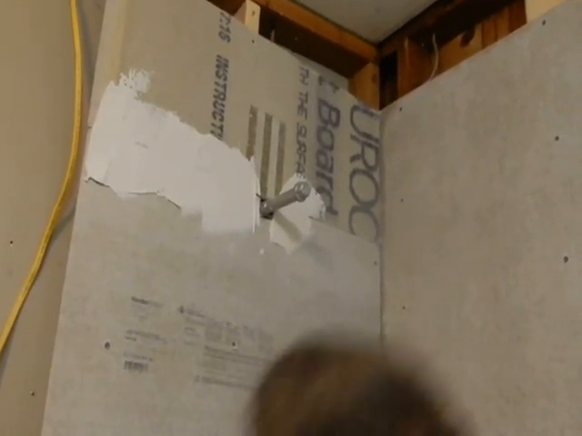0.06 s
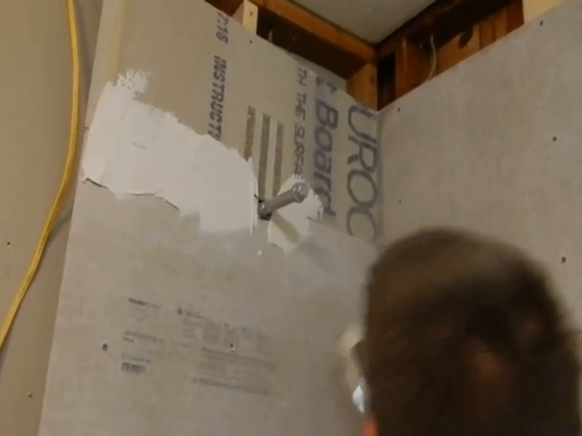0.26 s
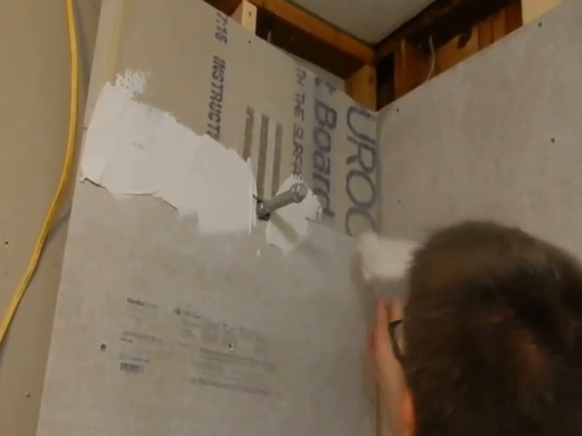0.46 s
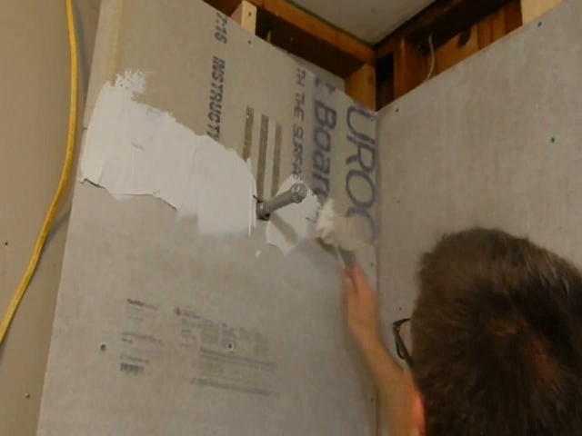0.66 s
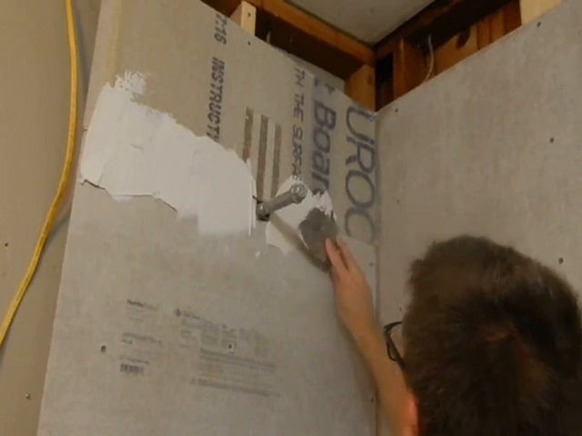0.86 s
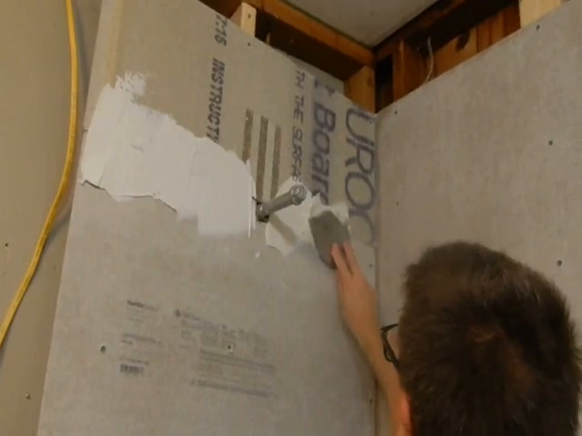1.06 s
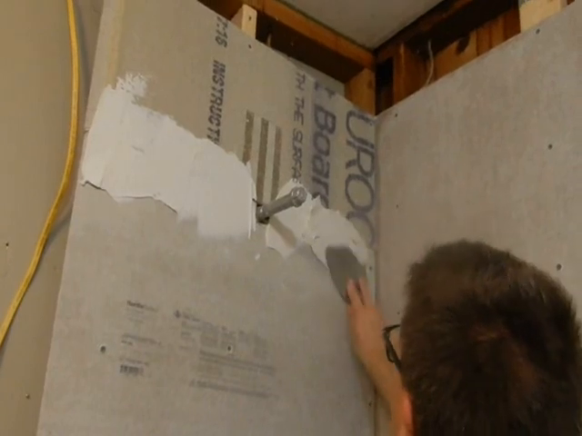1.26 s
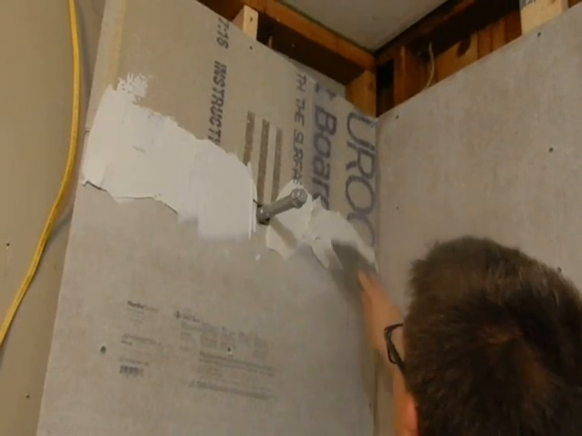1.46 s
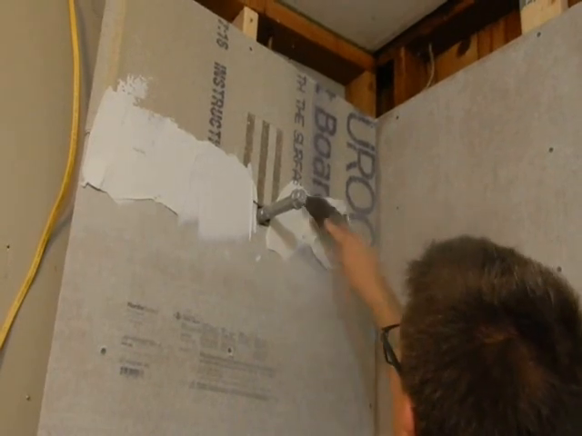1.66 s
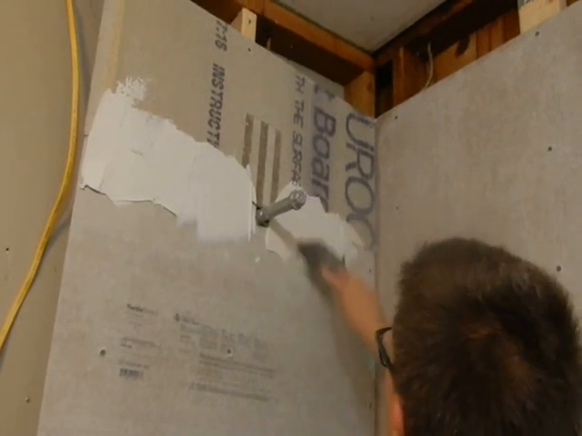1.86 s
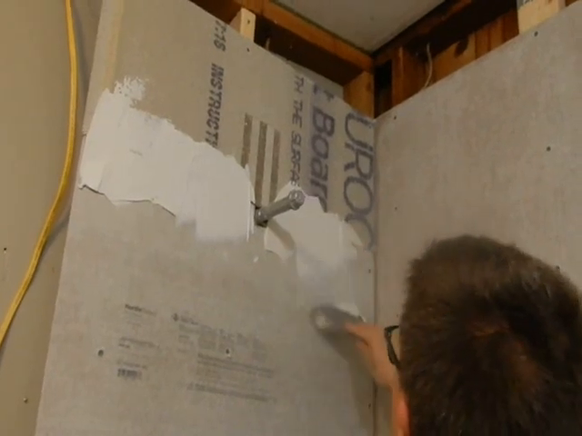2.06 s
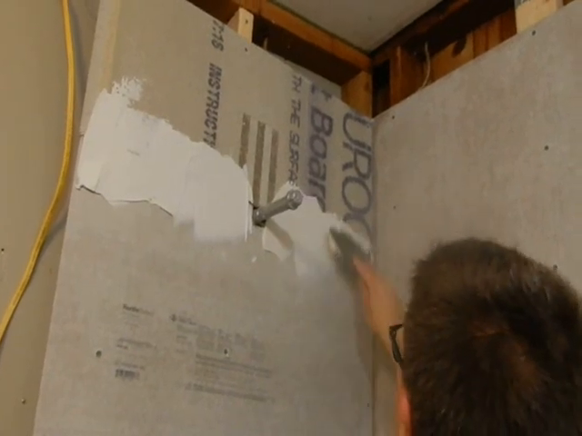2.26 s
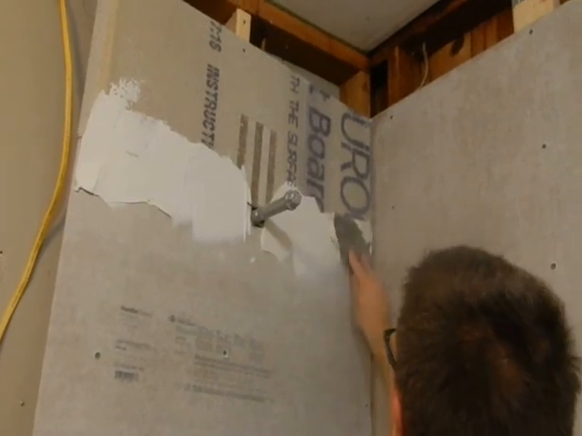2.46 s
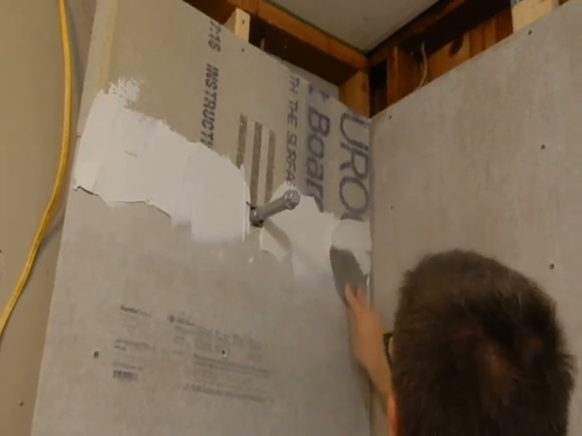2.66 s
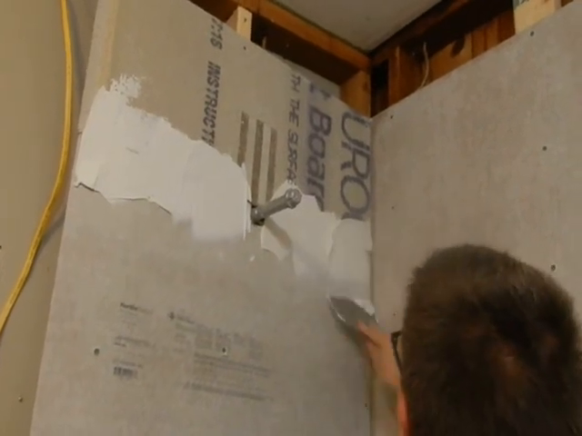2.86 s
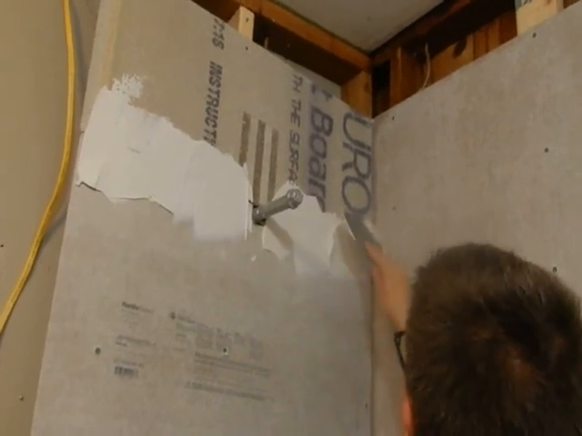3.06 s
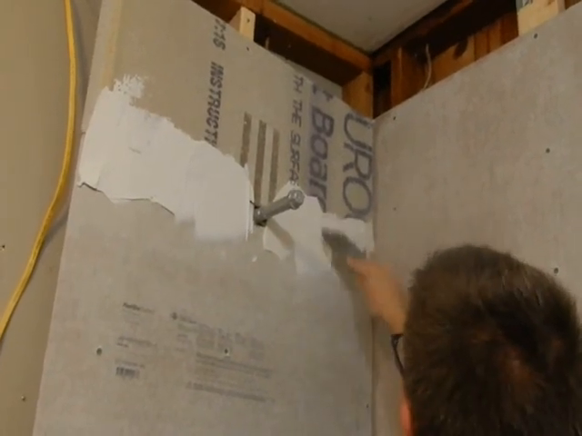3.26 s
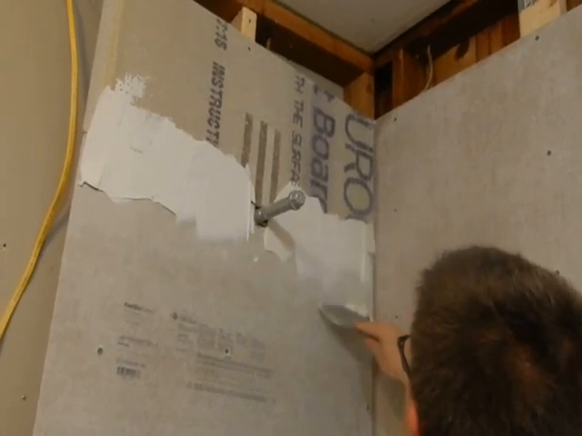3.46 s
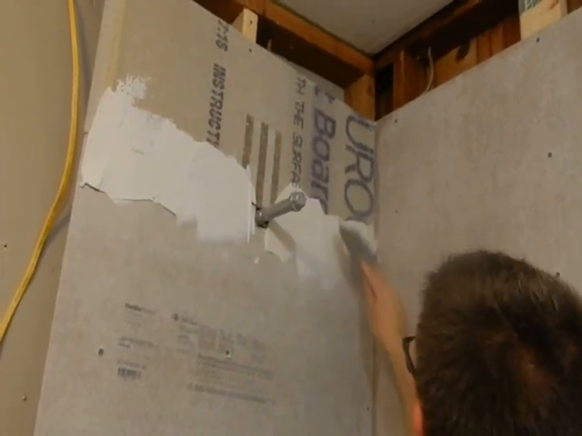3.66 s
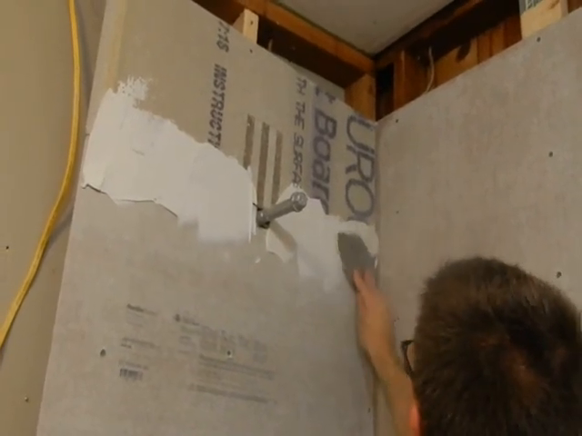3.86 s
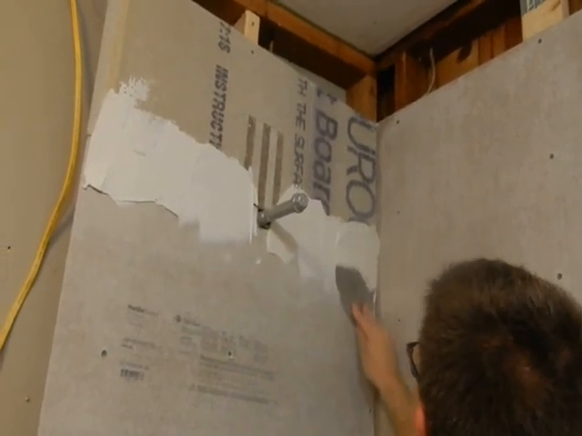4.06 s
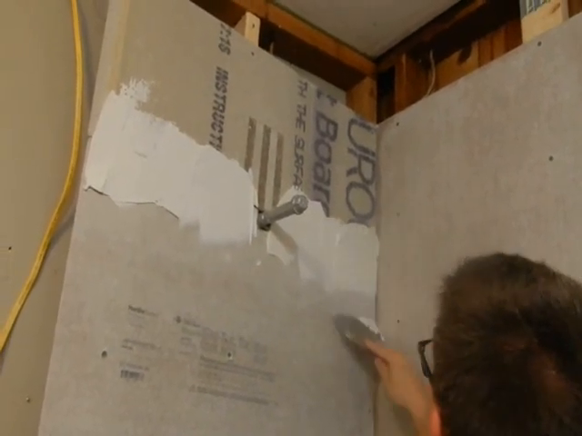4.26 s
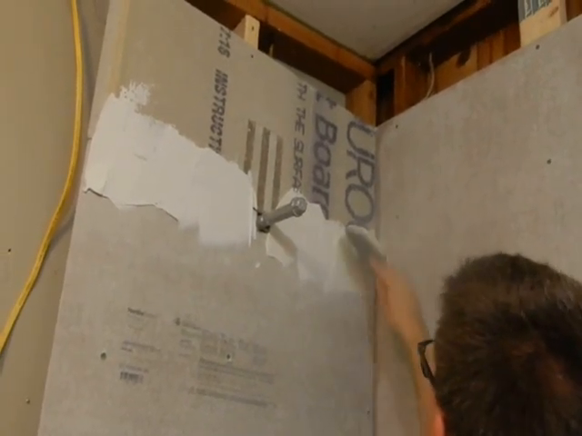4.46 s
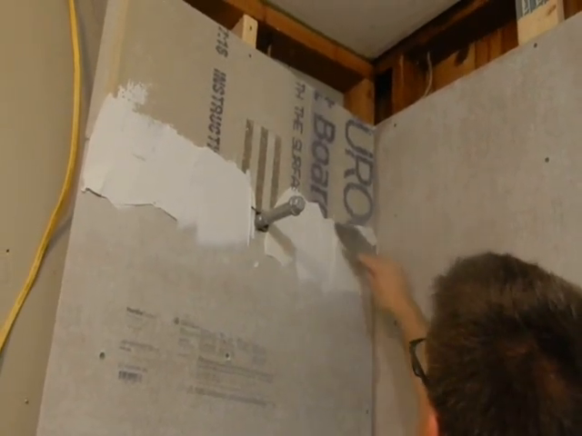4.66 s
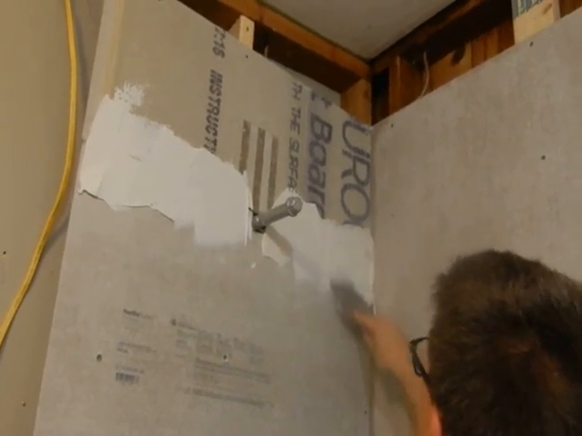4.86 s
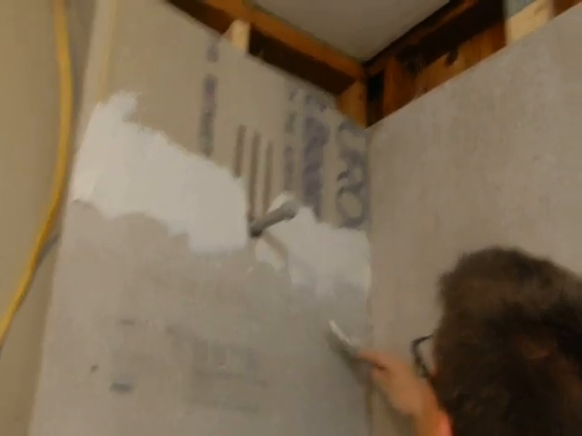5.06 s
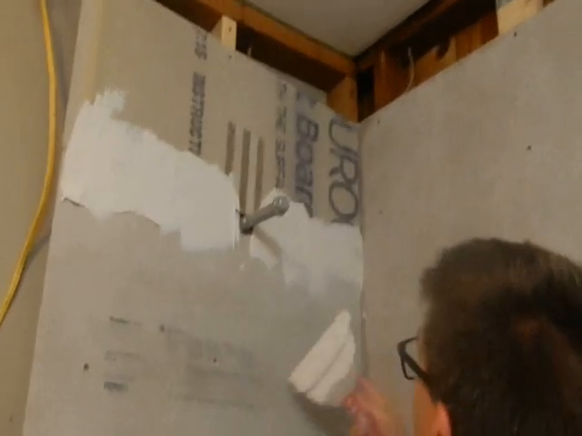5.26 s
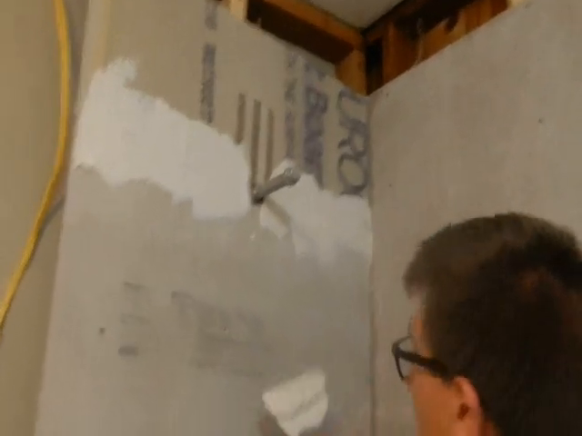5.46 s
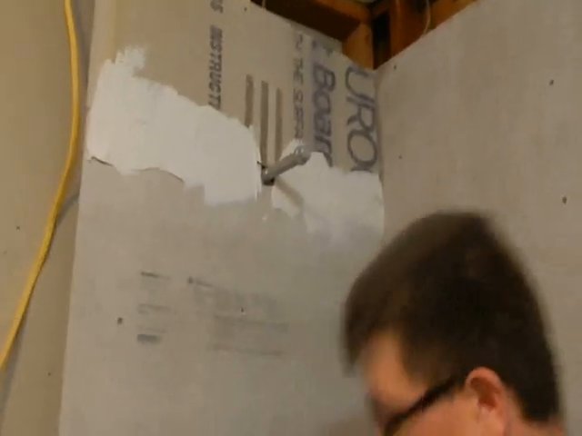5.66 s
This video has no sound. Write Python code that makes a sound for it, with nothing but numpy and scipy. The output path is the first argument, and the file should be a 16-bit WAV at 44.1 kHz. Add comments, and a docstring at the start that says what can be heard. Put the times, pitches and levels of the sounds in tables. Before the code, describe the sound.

Close stereo sound of a steel trowel working gritty mortar on hollow cement board in a small bare room, over faint, low, slightly wavering house air. It opens with a barely audible wet drag dying away, one tiny tick near 0.6 s, a dull touch at 0.9 and faint scrapes. At 1.5 s the blade bites: a sudden bright, ringing, chattering rasp with soft thuds. A light click-knock at 1.95 leads to a strong sandy swipe around 2.2. After a lull, a hard hollow knock with steel clack lands at 2.7, followed by shorter rasps until 3.1. A muffled thump at 3.4 precedes a clear scrape at 3.65. Another strong, slightly duller knock at 4.05 leads into wet, board-shaking scrapes to 4.5. The last bright, weighty knock comes at 4.8, then hissing strokes at 5.0, 5.2 and 5.4, with grain ticks, fading out by about 5.8. Echoes are brief and dense.

```python
"""A faint wet drag over quiet house air, then a steel trowel knocking and rasping in a small, bare bathroom.
The loaded blade spreads mortar on cement board: random grain clicks, coloured by spectra, hiss in its strokes.
Blows on the hollow wall ring sine modes of wall and blade and a dense clack; snapping grains are noise bursts.
Hard walls add a brief echo, and two close microphones behind the worker hear it all."""
import sys
import numpy as np
from scipy import signal
from scipy.io import wavfile

SR = 44100
rng = np.random.default_rng(int(sys.argv[2]) if len(sys.argv) > 2 else 0)


def generate_wav(sig):
    """Save sig (samples, or channels by samples) to the path in sys.argv[1] as 16-bit PCM at SR."""
    pcm = np.round(np.clip(np.atleast_2d(sig).T, -1, 1) * 32767).astype(np.int16)
    wavfile.write(sys.argv[1], SR, pcm)


N = 252252
T = np.arange(N) / SR

# Blade and hand meeting the wall. Each row: time in seconds, level in dB, treble corner in Hz (low is soft),
# weight as extra bass in dB, level of the tick at first touch in dB.
KNOCKS = [(0.892, -34.5, 296, 16.5, -57), (1.503, -16.5, 337, 10.5, -60), (1.585, -20, 148, 23.5, -63),
          (1.868, -31, 1200, 15.5, -25), (1.962, -12.5, 850, -6, -5.5), (2.588, -24.5, 760, 0, -27),
          (2.593, -15.5, 246, 12.5, -60), (2.7039, 0.5, 4500, -1.5, -8.5), (3.394, -20, 815, 14, -33),
          (3.4, -8.5, 166, 16.5, -60), (3.98, -18.5, 320, 9, -58), (4.0417, 2, 2690, -0.5, -9.5),
          (4.8032, 0.5, 4540, 5.5, -2), (5.068, -17.5, 360, 13, -36)]


def amp(db):
    """Decibels to gain."""
    return 10 ** (np.asarray(db) / 20)


def unit(x):
    """Scales to rms 1."""
    return x / np.sqrt(np.mean(x ** 2) + 1e-20)


def read(points, hz):
    """Reads a table on a log-frequency axis."""
    f, value = np.transpose(points)
    return np.interp(np.log(hz + 1), np.log(f + 1), value)


def add(mix, s, sound):
    """Lays a sound into the mix at time s, in seconds."""
    part = mix[round(s * SR):][:len(sound)]
    part += sound[:len(part)]


def colour(x, points, size=4096):
    """Causal minimum-phase filter of energy 1 with the given spectrum."""
    hz = abs(np.fft.fftfreq(size, 1 / SR))
    log_gain = np.log(amp(read(points, hz)))
    response = np.exp(np.conj(signal.hilbert(log_gain)))
    taps = np.fft.ifft(response).real[:size // 2]
    return signal.oaconvolve(x, taps / np.linalg.norm(taps))[:len(x)]


def cut(x, hz, kind, order=2):
    """Low-pass or high-pass."""
    sections = signal.butter(order, min(hz, SR / 2 - 1), kind, fs=SR, output="sos")
    return signal.sosfilt(sections, x)


def room_air():
    """The low, slowly wavering background of the house: coloured noise with a drifting level."""
    # Spectrum of the air. Each row: frequency in Hz, level in dB per Hz.
    air_spectrum = [(15, -40), (25, -16), (50, -4.5), (110, 2), (220, 0), (463, -4), (796, -10),
                    (988, -7.5), (1300, -16.5), (1900, -13), (4500, -17), (11000, -25.5), (16000, -38)]
    waver = amp(1.2 * unit(cut(rng.standard_normal(N), 2.1, "low")))
    return amp(-54.5) * waver * colour(rng.standard_normal(N), air_spectrum)


def tail(t60_factor, size=32768):
    """Dense reflections of energy 1, each band dying at its own speed."""
    # Decay of the hard-walled room, before t60_factor. Each row: frequency in Hz, time to fall 60 dB in seconds.
    room_t60 = [(150, 0.51), (550, 0.43), (1400, 0.4), (3700, 0.3), (10000, 0.26), (16000, 0.27)]
    hz, t, bands = signal.stft(rng.choice([-1., 1.], size), SR, nperseg=256)
    t60 = t60_factor * read(room_t60, hz)[:, None]
    ring = signal.istft(bands * amp(-60 * t / t60), SR)[1]
    return ring / np.linalg.norm(ring)


def room(x, direct_db, wet_db, count=8):
    """Direct sound and the quick, dense echo of hard walls, crossfading through several echo patterns."""
    out = amp(direct_db) * x
    for k in range(count):
        # 70 patterns a second take their turn, each with a cosine rise and fall
        place = (T * 70 - k + 1) % count - 1
        share = np.cos(np.pi / 2 * np.clip(place, -1, 1))
        delay = np.zeros(round(.003 * SR))
        echo = np.concatenate([delay, tail(0.81)])
        out = out + amp(wet_db) * signal.oaconvolve(x * share, echo)[:N]
    return out


def grains(per_s, size_db, clump_db, clump_hz):
    """Sand grains catching and letting go: clicks of uneven size that come in clumps."""
    sizes = amp(size_db * np.minimum(rng.exponential(1, N), 4))
    caught = rng.random(N) < per_s / SR
    clicks = rng.choice([-1., 1.], N) * sizes * caught
    clumps = unit(cut(rng.standard_normal(N), clump_hz, "low"))
    return unit(clicks * amp(clump_db * clumps))


def stroke(attack, hold, fade, size=49152):
    """Pressure of one stroke: lean in, hold, lift off. Also the time from the end of the attack."""
    ease_in = 1.78  # the hand leans in along a quarter sine raised to this power
    sag_db_per_s = 8  # the pressure slackens from the end of the attack onwards
    t = np.arange(size) / SR - attack
    lean = np.sin(np.pi / 2 * np.clip(1 + t / attack, 0, 1)) ** ease_in
    lift_db = -60 * np.maximum(t - hold, 0) / fade
    sag_db = -sag_db_per_s * np.maximum(t, 0)
    return lean * amp(lift_db + sag_db), t


def pressure(strokes, extra_column=None, slope_db_per_s=0):
    """Strength of all strokes in time; a column of extra dB, drifting through each stroke, may weight them."""
    power = np.zeros(N)
    for row in strokes:
        start, attack, hold, fade, db = row[:5]
        shape, t = stroke(attack, hold, fade)
        extra_db = 0 if extra_column is None else row[extra_column]
        strength = shape * amp(db + extra_db + slope_db_per_s * t)
        add(power, max(start, 0), strength ** 2)
    return np.sqrt(power + 1e-16)


def smearing():
    """Wet paste under the flat of the blade gives a finer, narrower hiss."""
    # Flat of the blade sliding on paste. Each row: start, attack and hold in seconds,
    # fade over 60 dB in seconds (sag apart), level in dB.
    smears = [ (0, 0.001, 0.18, 0.6, -42.5), (1.484, 0.0072, 0.007, 0.15, -24),
              (1.64, 0.08, 0.011, 0.37, -41), (2.57, 0.042, .02, 0.33, -49.5),
              (2.81, 0.057, .005, 0.11, -32.5), (2.905, .025, .005, 0.43, -30),
              (3.88, 0.045, .04, .6, -45.5), (4.19, 0.0039, 0.15, 0.6, -32)]
    # Spectrum of the paste. Each row: frequency in Hz, level in dB per Hz.
    paste_spectrum = [(150, -6.5), (500, -2), (1300, -23), (2200, -10), (3100, -9.5), (3900, 4.5),
                      (4400, 0), (5100, 3.5), (5800, -3), (7000, -8.5), (9000, -13.5), (16000, -26.5)]
    drive = grains(per_s=12000, size_db=0.5, clump_db=2.0, clump_hz=120)
    return colour(drive * pressure(smears), paste_spectrum)


def scraping():
    """Grains hiss at the blade edge, brighter as it bites, and shake the board underneath."""
    # Strokes of the edge over sand. Each row: start, attack and hold in seconds,
    # fade over 60 dB in seconds (sag apart), level in dB,
    # then bite as extra treble and drive into the board, both in dB at the end of the attack.
    scrapes = [ (0, 0.0033, 0.32, 1, -53.5, 13, 4.5), (.42, .05, 0.012, 0.29, -70, 19, 11),
               (.77, 0.039, .01, .3, -54.5, 4, 2), (.96, 0.032, .01, .3, -61, 4.5, -3),
               (1.1, .06, .01, 0.53, -46, -7.5, 5), (1.31, 0.087, .02, 0.59, -51.5, 6.5, 9.5),
               (1.483, 0.0056, 0.057, 0.31, -27, 5.5, 1), (1.6, 0.029, 0.2, 0.53, -65.5, -3, 20.5),
               (1.85, 0.024, 0.033, 0.35, -40.5, -10, -2), (1.9, 0.081, 0.018, 0.12, -28, -2, 1.5),
               (2.03, 0.078, 0.14, .2, -46.5, 4.5, 5), (2.165, 0.055, 0.033, 0.29, -18.5, 2.5, -1.5),
               (2.42, 0.041, 0.15, .2, -69, 19.5, -3), (2.7, 0.023, 0.077, 0.26, -30, -14, 7.5),
               (2.82, 0.034, .01, 0.24, -45, 13.5, 8), (2.915, 0.016, 0.12, 0.2, -30, -23, 7),
               (2.95, 0.098, 0.038, 0.21, -28.5, 0.5, 5), (3.388, 0.016, .005, 0.25, -42.5, -6, -1),
               (3.49, 0.068, 0.061, 0.22, -52, 4, 3), (3.597, 0.048, 0.031, 0.23, -21, 2, -2),
               (4.044, 0.0095, 0.033, .65, -33, -24, 13.5), (4.185, 0.017, 0.21, 0.34, -27.5, -17, -1),
               (4.325, 0.12, 0.049, .11, -25.5, -1, 4), (4.81, 0.09, .01, 0.62, -30.5, -9.5, 6.5),
               (4.98, 0.038, .005, 0.21, -32, -3.5, 5), (5.075, 0.12, 0.014, 0.45, -22, 2, 1),
               (5.29, 0.091, .005, 0.18, -23.5, -2, 1), (5.452, 0.01, 0.0059, 0.41, -35, 7.5, -2.5),
               (5.65, 0.072, .01, .2, -41.5, -1.5, 1)]
    # Spectra of sand and board. Each row: frequency in Hz, level in dB per Hz.
    sand_spectrum = [(300, -17.5), (1000, -42), (1350, -14.5), (1650, -3), (2400, 2), (3400, 0),
                     (4800, -2.5), (6500, -6), (8500, -8.5), (11000, -15), (16000, -25)]
    board_spectrum = [(50, -35), (130, -7), (250, -1), (420, -3.5), (620, 2.5), (830, -4), (1050, 0.5),
                      (1350, -15), (2200, -11.5), (6000, -26)]
    dulling_db_per_s = 40  # the edge is brightest as it sets in, and dulls as paste gathers on it
    bedding_db_per_s = 13  # and it couples more firmly to the board as it goes
    drive = grains(per_s=18000, size_db=1.0, clump_db=2.6, clump_hz=107)
    level = pressure(scrapes)
    bite = pressure(scrapes, extra_column=5, slope_db_per_s=-dulling_db_per_s) / level
    sand = colour(drive * level, sand_spectrum)
    # a second pass, backwards in time, offsets much of the first filter's phase shift
    backwards = cut(sand, 6030, "high")[::-1]
    treble = cut(backwards, 4300, "high")[::-1]
    sand = sand + treble * (bite - 1)
    push = pressure(scrapes, extra_column=6, slope_db_per_s=bedding_db_per_s)
    board = colour(drive * push, board_spectrum)
    return amp(0.67) * sand + amp(-11.5) * board


def chattering():
    """Fast stick and slip, as random clicks, rings the bending modes of the steel blade."""
    # The blade biting through to the board. Each row: start, attack and hold in seconds,
    # fade over 60 dB in seconds (sag apart), level in dB.
    chatter_strokes = [(1.485, 0.0099, .005, 0.24, -15.5), (2.917, 0.013, .003, 0.23, -34),
                       (4.195, 0.028, 0.067, 0.26, -33)]
    # Bending modes of the blade. Each row: frequency in Hz, width in Hz, level in dB.
    blade_modes = [(3700, 290, -7.5), (4177, 56, -3), (4510, 140, 2), (4600, 120, 1), (4860, 100, -2)]
    slips = grains(per_s=10000, size_db=2, clump_db=2, clump_hz=150)
    ring = np.zeros(N)
    for k, (hz, width, db) in enumerate(blade_modes):
        b, a = signal.iirpeak(hz, hz / width, SR)
        mode = unit(signal.lfilter(b, a, slips))
        ring += amp(db) * mode * (-1) ** k  # neighbouring modes alternate in sign
    return unit(cut(ring, 5000, "low", order=6)) * pressure(chatter_strokes)


def crack(events, decay_s, size=512):
    """A brief burst of fracture noise for each (s, dB)."""
    # Spectrum of a snapping grain. Each row: frequency in Hz, level in dB per Hz.
    snap_spectrum = [(300, 0), (1500, -11), (3000, 3.5), (6500, -4), (9000, -4), (12000, -11.5),
                     (16000, -14)]
    t, out = np.arange(size) / SR, np.zeros(N)
    for s, db in events:
        add(out, s, amp(db) * rng.standard_normal(size) * np.exp(-t / decay_s))
    return colour(out, snap_spectrum)


def ticking():
    """Single grains break brightly; the first touch of each blow is cushioned by the paste."""
    # Single sand grains snapping under the edge. Each row: time in seconds, level in dB.
    snaps = [(0.593, -27), (2.061, -18), (2.103, -31), (2.127, -29), (2.923, -26), (3.9725, -13.5),
             (5, -15), (5.46, -16)]
    first_touches = [(row[0], row[-1]) for row in KNOCKS]
    touches = cut(crack(first_touches, decay_s=0.0042), 5800, "low", order=1)
    return amp(-14.0) * (crack(snaps, decay_s=0.002) + touches)


def knocking(size=32768):
    """Each blow rings low modes of the wall, higher modes of the blade and a dense clack; soft ones lose treble."""
    # Modes of the hollow wall, and higher up of the steel blade.
    # Each row: frequency in Hz, level in dB, time to fall 60 dB in seconds.
    struck_modes = [(121.1, -32, 1), (155.9, -12, 0.4), (195.6, -3.5, 0.28), (237.8, -6.5, 0.33),
                    (263, -13, 0.42), (309.6, -4.5, 0.5), (340, -2, 0.31), (372.6, 0, 0.22),
                    (401, -9, 0.17), (462, -2.5, 0.31), (537, -6, 0.42), (573, -2.5, 0.45), (598, 6, 0.19),
                    (680, -3.5, 0.26), (683, 3, 0.13), (840, -11, 0.65), (854, -13, 0.56), (943, -11, 0.35),
                    (1022, -4.5, 0.29), (1133, -7, 0.25), (1840, -13, 0.24), (2033, -15, 0.36),
                    (2550, -14, 0.32), (2710, -5, 0.25), (3050, -4.5, 0.27), (3580, -16, 0.34)]
    # Spectrum of the clack. Each row: frequency in Hz, level in dB per Hz.
    clack_spectrum = [(30, -33), (80, -30), (150, -12), (320, -8.5), (620, -1.5), (1100, -4), (1400, -15),
                      (1900, -6), (2900, -4.5), (3600, -7), (5000, -16.5), (8000, -23), (16000, -18)]
    t, out = np.arange(size) / SR, np.zeros(N)
    for s, db, corner_hz, weight_db, _ in KNOCKS:
        modes = np.zeros(size)
        for hz, level, t60 in struck_modes:
            phase = rng.random()  # in turns
            modes += amp(level - 60 * t / t60) * np.sin(2 * np.pi * (hz * t + phase))
        modes *= 1 - np.exp(-t / 0.0094)  # the bending wave takes a moment to spread over the panel
        clack = colour(amp(-8.0) * tail(0.3) + tail(1.12), clack_spectrum)
        blow = cut(amp(-22.5) * modes + amp(12.5) * clack, corner_hz, "low", order=4)
        bass = cut(blow, 155, "low", order=1)
        add(out, s, amp(db) * (blow + (amp(weight_db) - 1) * bass))
    return out


def trowel():
    """Strokes and ticks sounding in the room, with the blows, whose dense clack rings on by itself."""
    strokes = room(scraping() + smearing() + chattering(), direct_db=-4.0, wet_db=-3.5)
    ticks = room(ticking(), direct_db=0, wet_db=-4)
    return strokes + ticks + knocking()


def microphones(source, spread, size=1025):
    """Two close microphones share a common sound; a diffuse part, shaped by spread, differs between them."""
    hz = np.linspace(0, SR / 2, size)
    taps = signal.firwin2(size, hz, amp(read(spread, hz)), fs=SR)
    mid = source()
    side = signal.oaconvolve(source(), taps, "same")  # same course in time, unrelated fine grain
    return np.array([mid + side, mid - side])


def scene():
    """Trowel work over the quiet of the house."""
    # Stereo spread of trowel and air. Each row: frequency in Hz, gain of the diffuse side part in dB.
    trowel_spread = [(60, -14), (250, -14), (2000, -31.5), (4000, -24.5), (8000, -13.5), (12000, -2.5),
                     (16000, -11)]
    air_spread = [(30, 4), (100, -4), (400, 0.5), (2000, -3), (8000, 0.5), (16000, 0)]
    return microphones(trowel, trowel_spread) + microphones(room_air, air_spread)


def record(dry):
    """The recorder's band limit, a steep low-pass at 15.9 kHz."""
    taps = signal.firwin(511, 15900, window=("kaiser", 9), fs=SR)
    return signal.oaconvolve(dry, taps[None], "same")


dry = scene()
out = record(dry)
generate_wav(out)
```